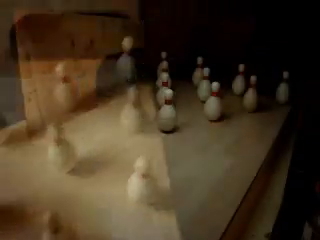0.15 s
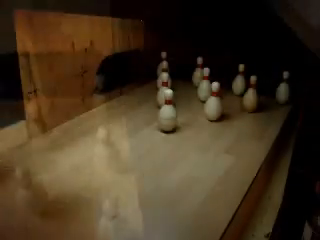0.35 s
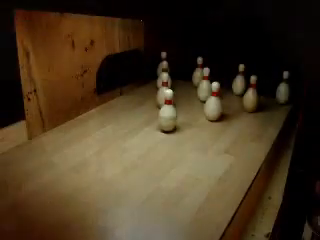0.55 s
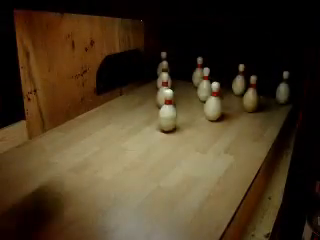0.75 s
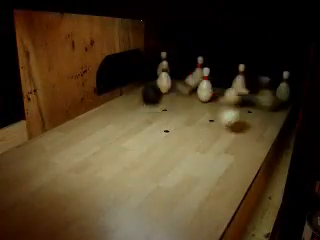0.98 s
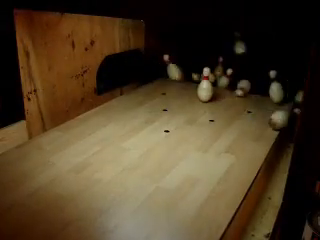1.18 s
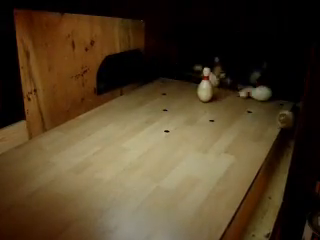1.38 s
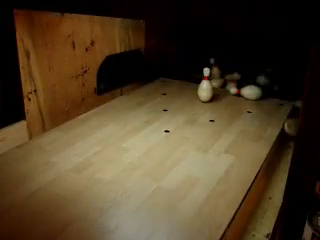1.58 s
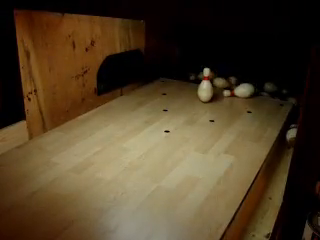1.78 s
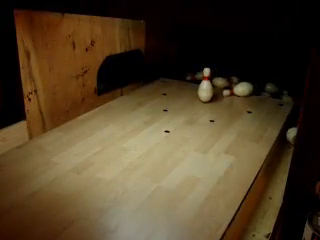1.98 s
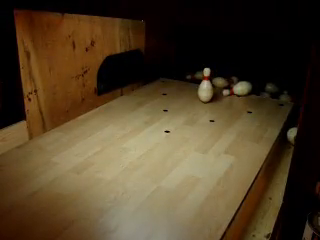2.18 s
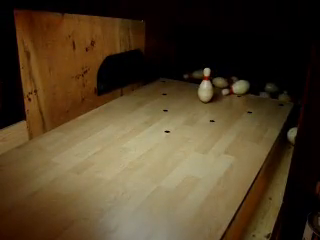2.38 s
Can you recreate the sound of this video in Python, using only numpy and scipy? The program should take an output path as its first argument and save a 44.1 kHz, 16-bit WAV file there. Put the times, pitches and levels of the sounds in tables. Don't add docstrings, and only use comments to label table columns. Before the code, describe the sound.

Bowling strike on a short wooden lane: ball drop, rumbling roll, bright pin crash, hollow tumbling knocks

```python
import sys
import numpy as np
from scipy import signal
from scipy.fft import rfft, irfft
from scipy.io import wavfile

SR = 44100
rng = np.random.default_rng(int(sys.argv[2]) if len(sys.argv) > 2 else 0)


def put_to_file(sound):
    columns = np.atleast_2d(sound).T
    safe = np.clip(columns, -1, 1)
    whole_steps = np.round(safe * 32767)
    wavfile.write(sys.argv[1], SR, whole_steps.astype(np.int16))


def gain_from_decibels(decibels):
    exponent = np.asarray(decibels, float) / 20
    return 10 ** exponent


N = 108045

# freq_hz, density_db (dB per Hz)
BOARDS = [(35, -36), (60, -33), (395, 0), (472, -5), (515, -2.5), (629, -4), (959, -4), (6740, -68.5),
          (12000, -35), (15600, -137), (22000, -120)]
# freq_hz, width_hz, level_db
LANE_MODES = [(270, 70, -13.5), (335, 75, 1.5), (417, 75, -6.5), (476.4, 27, -6), (556, 56, -2),
              (680, 79, -4), (768, 64, -23), (1015, 59, -2)]
# freq_hz, density_db (dB per Hz)
GRIT = [(530, -1), (900, 8), (1190, -2.5), (1350, 3.5), (3640, -4), (11400, -23), (12500, -18),
        (16200, -62), (22000, -120)]
# start_s, knock_db, thud_db (in the lane), crack_db
KNOCKS = [(.557, -8, -7, -22), (0.742, -5, -2, -2), (1, -24, -30, -4), (1.012, -33, -30, 4),
          (1.05, -24, -30, 5), (1.078, -22, -30, -2.5), (1.372, -30, -33, -14.5), (1.4227, -2, -8, 3),
          (1.479, -5, -4, 3), (1.5626, -8, -4.5, -0.5), (1.6778, 2.5, 9, 0), (1.697, -6, 2.5, -11),
          (1.7762, 6, -4, -1), (1.806, 2.5, -4, -14), (1.925, -9, -6, -17), (2.130, -2, 3, -27),
          (2.394, -62, -24.5, -38)]


def rms_one(x):
    return x / np.sqrt(np.mean(x ** 2) + 1e-20)


def in_time(rows, outside=None):
    s, *columns = np.transpose(rows)
    t = np.arange(N) / SR
    return [np.interp(t, s, column, outside, outside) for column in columns]


def at_hz(points, hz):
    table_hz, values = np.array(points)[:, 0], np.array(points)[:, 1]
    return np.interp(np.log(hz), np.log(table_hz), values)


def colour(x, spectrum):
    hz = np.maximum(np.arange(2049) * SR / 4096, 10)
    db = at_hz(spectrum, hz) + 12 * np.minimum(np.log2(hz / spectrum[0][0]), 0)
    cepstrum = irfft(np.log(gain_from_decibels(db)))
    cepstrum[1:2048] *= 2
    cepstrum[2049:] = 0
    pulse = irfft(np.exp(rfft(cepstrum)))
    return signal.fftconvolve(x, pulse / np.linalg.norm(pulse))[:N]


def modes(clicks, table, pitch=1, centre_hz=None):
    spread_db, focus_db = 3, 7
    out, energy = 0, 0
    for hz, width_hz, db in table:
        radius = np.exp(-np.pi * width_hz / SR)
        angle = 2 * np.pi * hz * pitch / SR
        near_db = 0 if centre_hz is None else -focus_db * np.log2(hz / centre_hz) ** 2 * 4
        strength_db = db + near_db + spread_db * rng.standard_normal(N)
        struck = clicks * gain_from_decibels(strength_db) + 1e-18
        resonator = [1, -2 * radius * np.cos(angle), radius * radius]
        out = out + signal.lfilter([0, np.sin(angle)], resonator, struck)
        energy += gain_from_decibels(2 * db) / (1 - radius * radius) / 2
    return out / np.sqrt(energy)


def grains(per_s, spread_db):
    sizes = gain_from_decibels(spread_db * np.minimum(rng.exponential(1, N), 3.2))
    signed = sizes * rng.choice([-1, 1], N)
    return rms_one(signed * (rng.random(N) < per_s / SR))


def clicks_at(s, db):
    out = np.zeros(N)
    out[(np.asarray(s) * SR).astype(int)] = -gain_from_decibels(db)
    return out


def lane(clicks):
    return colour(clicks, BOARDS) + gain_from_decibels(-9) * modes(clicks, LANE_MODES)


def background():
    # freq_hz, density_db (dB per Hz)
    air_spectrum = [(18, -35), (30, -16), (64, -8.5), (87, -15), (636, -5.5), (798, -8), (2080, -14.5),
                    (7740, -23.5), (12500, -30), (16200, -62), (22000, -120)]
    # time_s, level_db
    shuffle_levels = [
        (0, -52),
        (.04, -48),
        (.1, -59),
    ]
    air_db, hum_hz, hum_db = -53, 58, -62
    air = gain_from_decibels(air_db) * colour(rng.standard_normal(N), air_spectrum)
    shuffle = gain_from_decibels(in_time(shuffle_levels, -90)[0]) * colour(rng.standard_normal(N), GRIT)
    hum = gain_from_decibels(hum_db) * np.sin(2 * np.pi * hum_hz * np.arange(N) / SR)
    return air + shuffle + hum


def landing():
    # start_s, peak_db
    contacts = [
        (0.2448, -16.5),
        (0.2491, 12),
        (0.263, 1),
    ]
    s, db = np.transpose(contacts)
    return lane(clicks_at(s, db + 16.5))


def rolling():
    # time_s, rumble_db, grit_db
    roll_levels = [(.27, -15, -27), (.45, -19.5, -28), (.55, -26.5, -26), (.63, -18.5, -26),
                   (.67, -15, -27), (.74, -18, -25), (.81, -12.5, -22), (.88, -17, -23.5), (.94, -33, -23)]
    # time_s, centre_hz
    roll_boards = [(.27, 350), (.62, 330), (.66, 480), (.74, 580), (.81, 700), (.85, 520), (.95, 450)]
    broad_db, mode_db = -6, 5
    level_db, grit_db = in_time(roll_levels)
    centre_hz, = in_time(roll_boards)
    t = np.arange(N) / SR
    moving = (t > roll_levels[0][0]) & (t < roll_levels[-1][0])
    rumble = grains(450, 3.2) * gain_from_decibels(level_db - 9) * moving
    grit = grains(4000, 1.5) * gain_from_decibels(grit_db) * moving
    broad = gain_from_decibels(broad_db) * colour(rumble, BOARDS)
    ringing = gain_from_decibels(mode_db) * modes(rumble, LANE_MODES, centre_hz=centre_hz)
    return broad + ringing + colour(grit, GRIT)


def knocks():
    # freq_hz, density_db (dB per Hz)
    wall_spectrum = [(180, -33), (300, -2.5), (484, -5), (1220, -7), (1800, -9.5), (2690, -26.5),
                     (12000, -47), (15600, -98), (22000, -120)]
    s, db, thud_db = np.transpose(KNOCKS)[:3]
    return colour(clicks_at(s, db + 12.5), wall_spectrum) + lane(clicks_at(s, thud_db + 5))


def cracks():
    crack_hz = [1200, 700, 1500, 1400, 1300, 4500, 3900, 1600, 1900, 4000, 1100, 800, 1400, 1000, 1000,
                1300, 3000]
    quality, decay_s, splinter = 1.1, .0012, .3
    out, t = np.zeros(N + 400), np.arange(400) / SR
    noises = rng.standard_normal((len(KNOCKS), 400))
    for (s, _, _, db), hz, noise in zip(KNOCKS, crack_hz, noises):
        burst = splinter * noise * np.exp(-t / decay_s) - 2 * (t == 0)
        band = signal.iirpeak(hz, quality, fs=SR)
        once = signal.lfilter(*band, burst)
        twice = signal.lfilter(*band, once)
        out[int(s * SR):][:400] += gain_from_decibels(db + 14) * (twice + 0.07 * once)
    return out[:N]


def tumble():
    # time_s, level_db, weight_db (on the lane)
    tumble_levels = [(.88, -41, -14), (.95, -9.5, -3.5), (1.0, -17, -19), (1.115, -10, -20.5),
                     (1.14, -13.5, 0), (1.2, -10, -9), (1.25, -19.5, 5.5), (1.29, -10.5, -6.5),
                     (1.35, -14.5, 1), (1.38, -34.5, 11.5), (1.5, -22, -4), (1.6, -19, 1), (1.66, -29, 6),
                     (1.73, -21.5, -4), (1.77, -27, 8), (1.8, -17.5, -4.5), (1.87, -23, 10),
                     (1.92, -35, -7)]
    # freq_hz, density_db (dB per Hz)
    wood_spectrum = [(290, -26.5), (500, 2), (1020, -3.5), (1120, 1), (1490, -3), (3040, -9.5), (5140, -28),
                     (10900, -32), (12500, -54.5), (16200, -68), (22000, -120)]
    level_db, weight_db = in_time(tumble_levels, -81)
    hits = grains(1600, 3.6) * gain_from_decibels(level_db - 4)
    return colour(hits, wood_spectrum) + lane(hits * gain_from_decibels(weight_db - 2))


def chatter():
    # start_s, length_s, pitch_factor
    runs = [(.955, .03, .96), (1.0, .03, 1.065), (1.03, .027, 1.04), (1.057, .033, .99), (1.09, .032, .975),
            (1.826, .055, 1.01)]
    # neck_db, belly_db
    run_levels = [(-17, -32), (-6, -3), (-6.5, -5.5), (-6, -6), (-5.5, -15), (-24, -34)]
    # freq_hz, width_hz, level_db
    neck_modes = [(2660, 110, -2), (3110, 240, 9.5), (3062, 38, -0.5), (4120, 690, 9), (5550, 260, -7),
                  (8920, 120, -12), (10400, 98, -23)]
    # freq_hz, width_hz, level_db
    belly_modes = [(1120, 50, 6.5), (1200, 89, -27), (1358, 97, 10.5), (1594, 40, 2)]
    t, out = np.arange(N) / SR, 0
    hits = grains(1100, 2.2)
    for (s, length, pitch), (neck_db, belly_db) in zip(runs, run_levels):
        run = hits * ((t > s) & (t < s + length))
        neck = modes(run * gain_from_decibels(neck_db - 3.5), neck_modes, pitch)
        belly = modes(run * gain_from_decibels(belly_db - 2.5), belly_modes, pitch)
        out = out + neck + belly
    return out


def room(x):
    # freq_hz, t60_s
    room_t60 = [(100, 0.71), (400, .44), (1500, 0.41), (4000, 0.56), (10000, 0.44)]
    rise_s = 0.0013
    t = np.arange(32768) / SR
    white = rfft(rng.standard_normal(len(t)))
    octave = np.log2(np.maximum(np.fft.rfftfreq(len(t), 1 / SR), 40) / 40)
    tail = 0
    for k in range(11):
        band = irfft(white * np.clip(1 - np.abs(octave - k), 0, 1))
        tail = tail + band * gain_from_decibels(-60 * t / at_hz(room_t60, 40 * 2 ** k))
    tail = tail * (1 - np.exp(-t / rise_s))
    return signal.fftconvolve(x, tail / np.linalg.norm(tail))[:N]


def scene():
    room_db, far_direct_db = 2, 3
    # source, direct level (dB), further level of its tail (dB)
    sources = [
        (landing() + rolling(), far_direct_db, 0),
        (knocks(), -6, 0),
        (cracks(), 0, -2.5),
        (tumble(), far_direct_db, 0),
        (chatter(), 0, -16),
    ]
    mix = background()
    for x, dry_db, wet_db in sources:
        mix = mix + gain_from_decibels(dry_db) * x + gain_from_decibels(room_db + wet_db) * room(x)
    return mix[None]


def roll_off(x):
    return signal.sosfilt(signal.butter(12, 12750, fs=SR, output="sos"), x)


def record(dry):
    # time_s, gain_db
    duck_gain = [
        (.9995, 0),
        (1.003, -7),
        (1.118, -7),
        (1.14, 0),
    ]
    # time_s, ceiling_db
    headroom = [(.36, 0), (.5, 2), (.75, 4.5)]
    mic_low_hz, top_cut_hz = 97, 13300
    top, bottom, hardness = .47, .6, 4.5
    bass_cut = signal.butter(2, mic_low_hz, "high", fs=SR, output="sos")
    x = signal.sosfilt(bass_cut, dry) * gain_from_decibels(in_time(duck_gain)[0])
    limit = np.where(x > 0, top, bottom) * gain_from_decibels(in_time(headroom)[0])
    x = x / (1 + (np.abs(x) / limit) ** hardness) ** (1 / hardness)
    x = signal.sosfilt(signal.butter(1, 12, "high", fs=SR, output="sos"), x)
    x = signal.sosfilt(signal.cheby2(12, 60, top_cut_hz, fs=SR, output="sos"), x)
    return roll_off(np.clip(x, -1, 1))


dry = scene()
out = record(dry)
put_to_file(out)
```